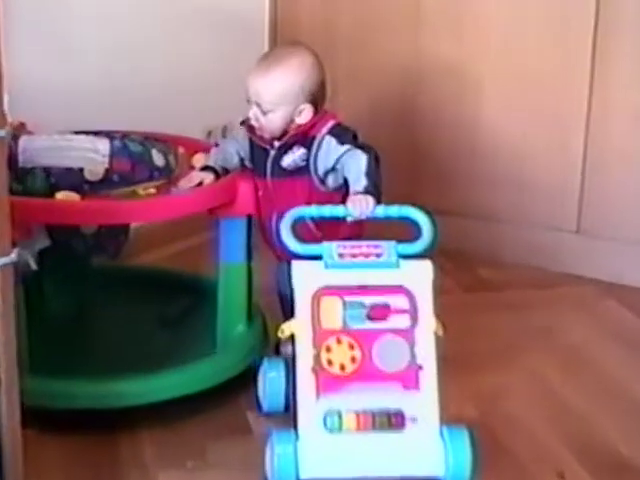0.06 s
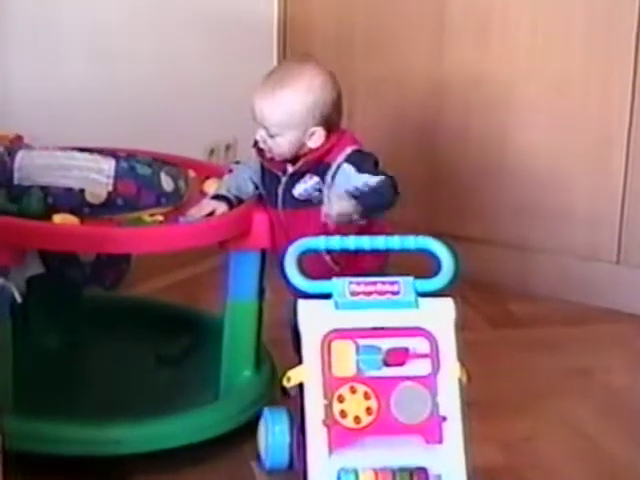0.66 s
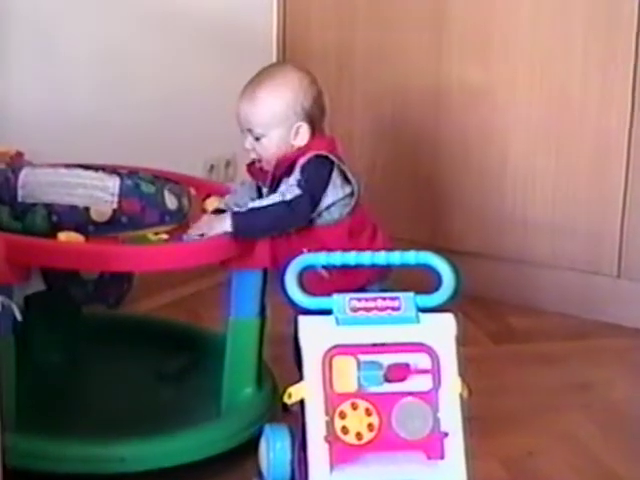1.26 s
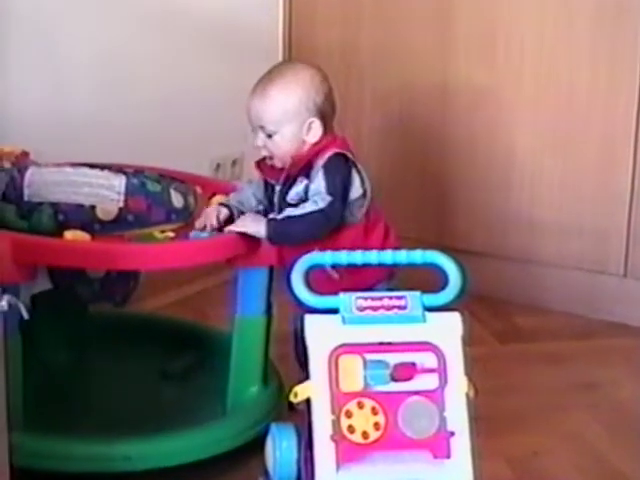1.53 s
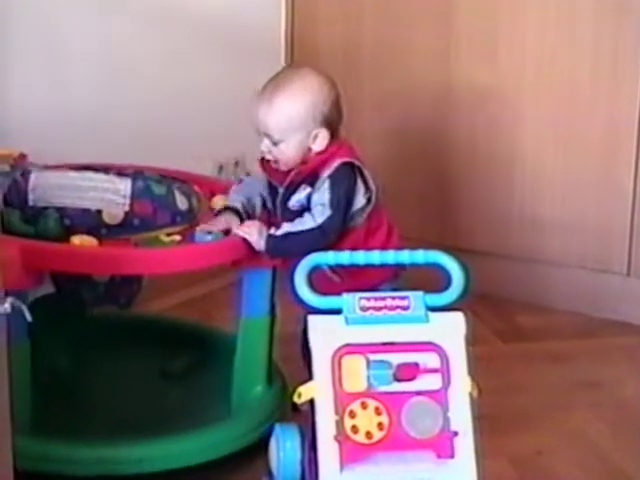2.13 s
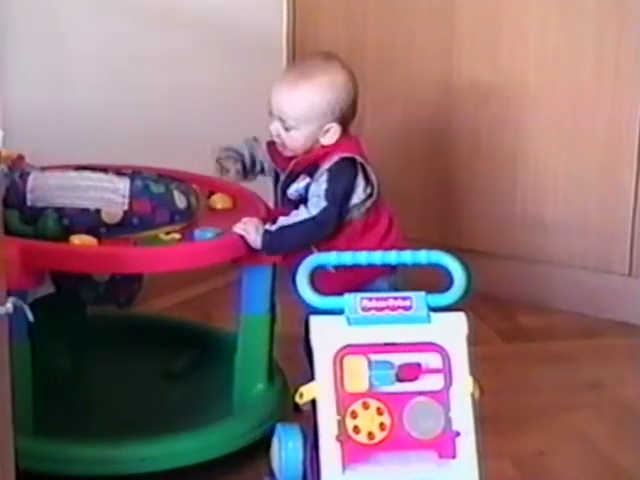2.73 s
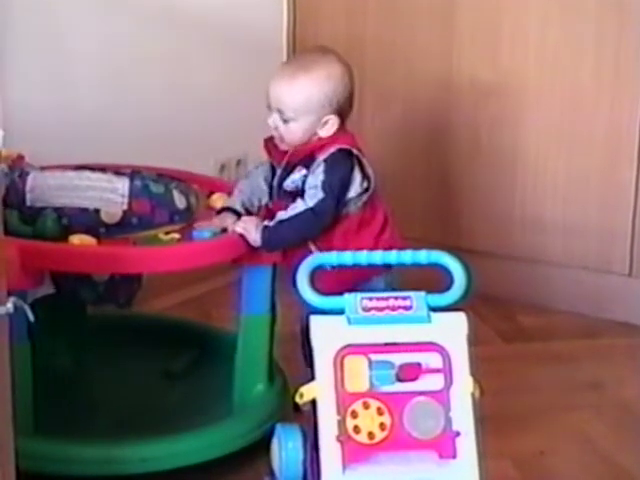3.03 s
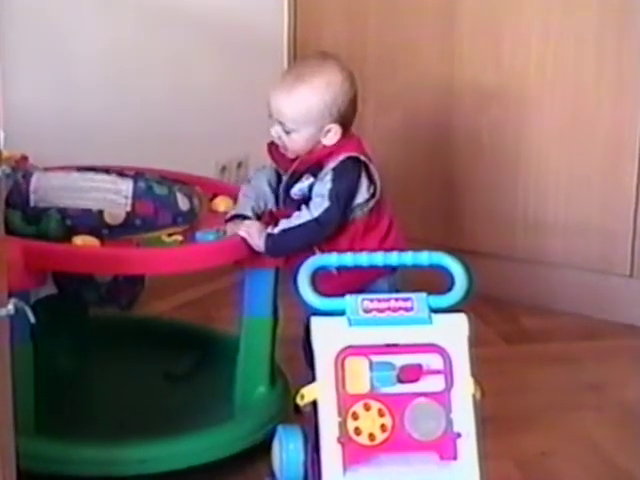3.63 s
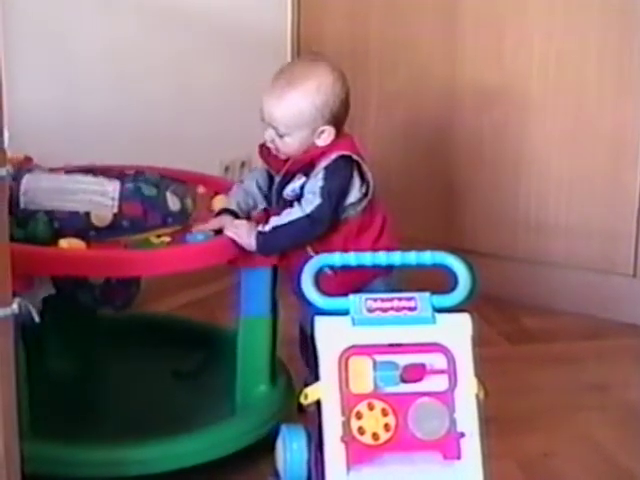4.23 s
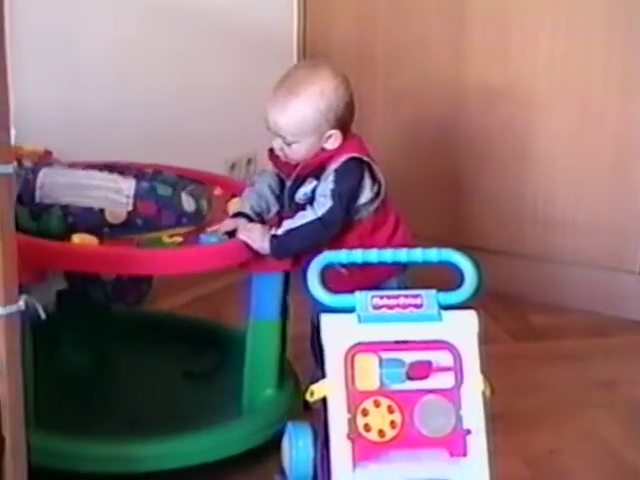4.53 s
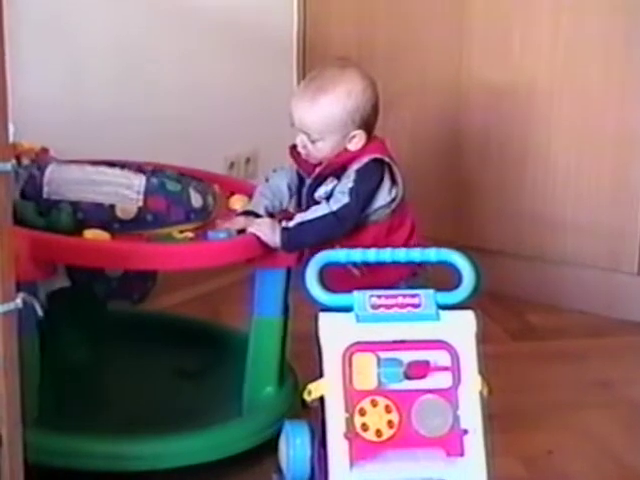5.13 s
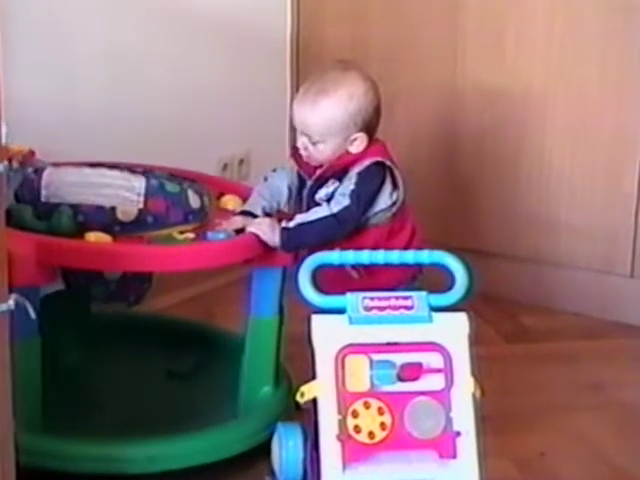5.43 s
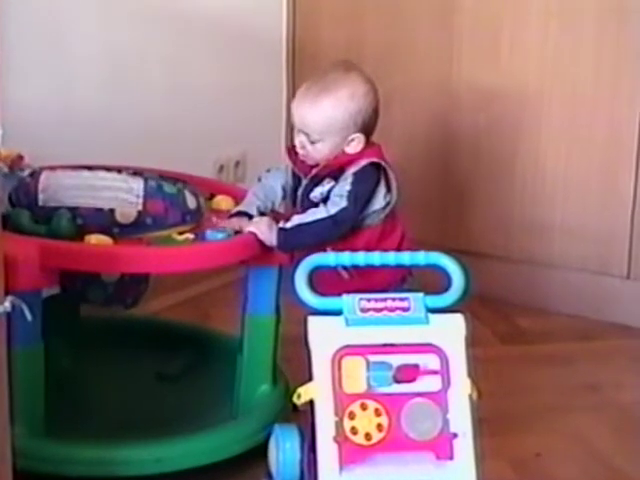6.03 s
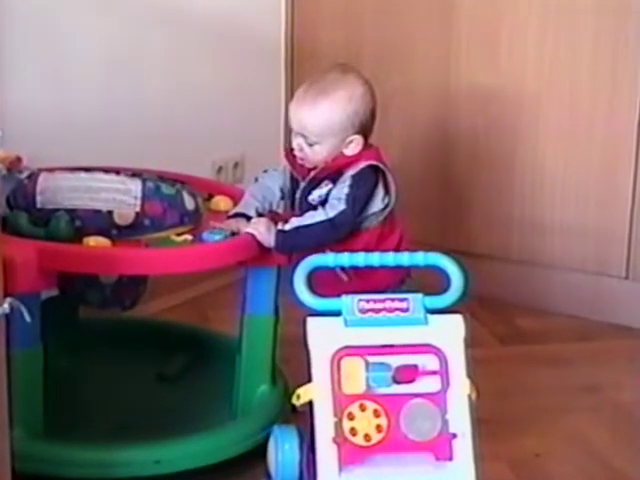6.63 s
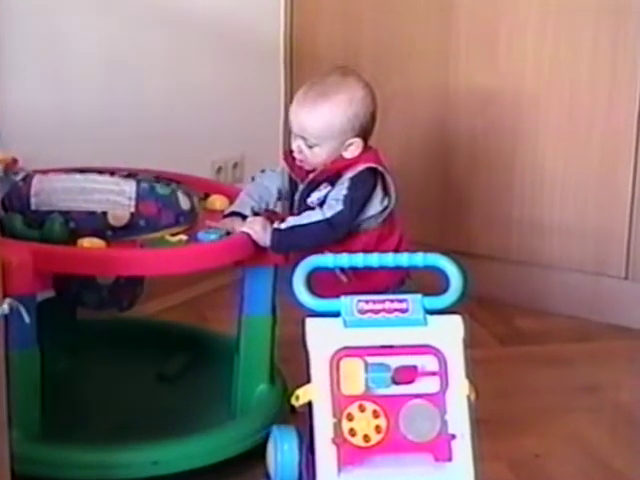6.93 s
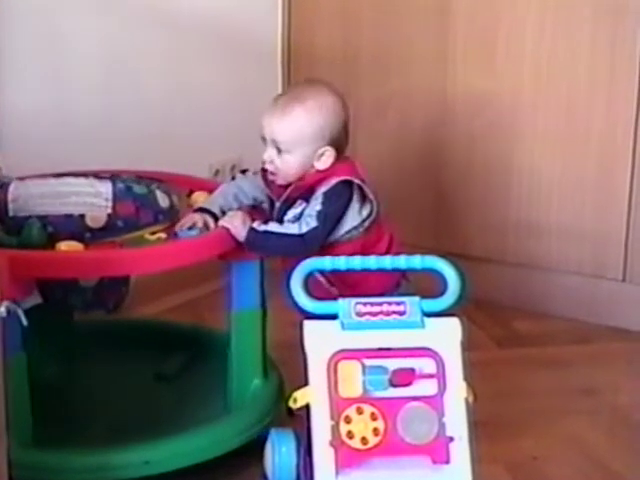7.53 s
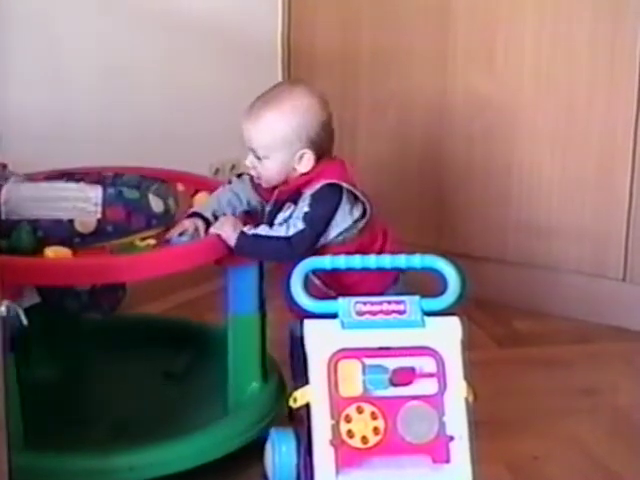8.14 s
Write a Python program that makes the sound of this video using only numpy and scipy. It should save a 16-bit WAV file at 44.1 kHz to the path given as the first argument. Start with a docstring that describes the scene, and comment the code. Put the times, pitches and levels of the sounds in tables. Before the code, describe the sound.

In a small, slightly echoing room, one light slap on a hollow plastic tray leads to four louder ones about half a second apart and a last, weaker one, each shaking loose toys. After that come only soft, scattered knocks, small clicks and the rub of a hand and sleeve. The sound sits slightly to the right, over steady low hiss and a faint camera motor.

```python
"""A baby slaps the hollow plastic tray of a play seat in a small room with a wooden floor.
Each slap pops the air under the palm, booms in the tray and rings the toys fixed to it.
Loose toys rattle after it. Between slaps, hands and toys knock, click and rub lightly
and a sleeve swishes. A tape camera whirs over steady hiss."""
import sys
import numpy as np
from scipy import signal
from scipy.fft import rfft, irfft, next_fast_len
from scipy.io import wavfile
from scipy.ndimage import map_coordinates

SR = 44100
rng = np.random.default_rng(int(sys.argv[2]) if len(sys.argv) > 2 else 0)


def bounce(signal):
    """Save signal as a 16-bit WAV file at the path given by the first command-line argument."""
    frames = np.transpose(np.atleast_2d(signal))
    limited = np.clip(frames, -1, 1)
    pcm = np.round(limited * 32767).astype(np.int16)
    wavfile.write(sys.argv[1], SR, pcm)


N = 369116
SIZE = 32768  # samples per contact
T, HZ = np.arange(SIZE) / SR, np.fft.rfftfreq(SIZE, 1 / SR)
TIME = np.arange(N) / SR

# slaps: t/s, palm lag/s, tray/dB, bass/dB, treble/dB,
# finger pop/Hz, palm pop/Hz, pop width/Hz, pop/dB, bead/dB, button/dB
SLAPS = [(.951, .003, -24, 6.5, 3.5, 1105, 1227, 32, 1, -17, -55),
         (1.956, 0.0043, -7.5, -1.5, 1, 1460, 1470, 80, -10, -5.5, -42),
         (2.373, .006, -4, -0.5, -2, 1210, 1340, 115, -4, -11, -11.5),
         (2.871, 0.012, -4.5, -1, 1, 840, 880, 118, -7, -38, -13.5),
         (2.901, .003, -13, 6.5, 8, 1175, 1190, 150, -9.5, -15, -27),
         (3.499, .003, -7.5, -0.5, 2.5, 1560, 1306, 177, -4.5, -12.5, -8.5),
         (4.097, .002, -21, 2, 6.5, 1290, 1255, 104, -4.5, -19, -15)]
# soft-contact spectrum: f/Hz, level/dB
SOFT_SPECTRUM = [(30, -16), (120, -10), (260, -4.5), (500, -4), (1000, 2), (1500, -2), (2500, -5.5),
                 (4000, -16.5), (8000, -30.5), (16000, -39)]
# left-right coherence of room sound: f/Hz, coherence
ROOM_COHERENCE = [(60, 1), (150, 0.25), (380, 0.54), (950, 0.77), (2380, 0.67), (5980, 0.3), (15000, 0.065)]


def slaps(finger_db=-5, finger_treble_db=5.5, puff_db=-33, puff_hz=45, puff_decay_s=0.01):
    """Fingers land, then the palm; each sounds tray, trapped air and toys, and pushes a puff of air."""
    # hard-contact spectrum: f/Hz, level/dB
    hard_spectrum = [(30, -26), (110, -17.5), (170, -13.5), (250, -4), (450, -5), (1000, -1.5),
                     (1900, -2.5), (3000, -6), (5000, -13.5), (8000, -16), (12500, -28), (16000, -24)]
    # toy resonances: f/Hz, width/Hz, level/dB
    bead_modes = [(3397, 68, 3.5), (3460, 32, -12.5), (3700, 90, -41), (7030, 100, -8), (8280, 82, -15),
                  (8640, 500, -13.5), (9140, 80, -16), (11740, 210, -13)]
    button_modes = [(3620, 170, -4), (4030, 99, -1.5), (4330, 35, 1.5), (4500, 30.6, -6), (4650, 21, -16),
                    (5600, 50, -3), (6600, 38, -14), (7250, 28, -22), (9270, 68, -14), (11050, 720, -17)]
    out = np.zeros((2, N))
    puff = np.sin(2 * np.pi * puff_hz * T) * np.exp(-T / puff_decay_s)
    bead, button = ring(bead_modes, HZ), ring(button_modes, HZ)
    for (start_s, lag_s, db, bass_db, treble_db,
         finger_hz, palm_hz, width_hz, pop_db, bead_db, button_db) in SLAPS:
        toys = amp(bead_db) * bead + amp(button_db) * button
        finger_shell = tray(hard_spectrum, bass_db, treble_db + finger_treble_db)
        palm_shell = tray(hard_spectrum, bass_db, treble_db)
        fingers = (start_s, db + finger_db, finger_shell, finger_hz)
        palm = (start_s + lag_s, db, palm_shell, palm_hz)
        for at_s, force_db, shell, pop_hz in (fingers, palm):
            pop = ring([(pop_hz, width_hz, pop_db)], HZ)
            hit = contact(amp(force_db) * shell + pop + toys)
            add(out, at_s, hit + amp(puff_db + 0.4 * force_db) * puff)
    return out


def tray(spectrum, bass_db, treble_db, bass_hz=550, treble_hz=3200, modes_db=-1, scatter_db=2):
    """Tray response: heavy contacts add bass, hard ones treble; each spot favours other modes."""
    # tray resonances: f/Hz, width/Hz, level/dB
    tray_modes = [(243.7, 9.3, 4.5), (317, 76, -12.5), (529, 9.5, 0), (713, 5.1, 2), (839, 5.1, 0),
                  (913, 6, -3), (1112, 46, -4), (1300, 12, -3.5), (1590, 7.3, -24), (2100, 22, -7),
                  (2312, 18, -3.5), (3120, 15, 5), (3330, 16, -6), (4480, 13, -13), (7600, 13, -22)]
    shelves_db = bass_db / (1 + (HZ / bass_hz) ** 4) + treble_db / (1 + (treble_hz / (HZ + 1)) ** 4)
    modes = [(hz, width_hz, db + scatter_db * rng.standard_normal()) for hz, width_hz, db in tray_modes]
    return minimum_phase(shelves_db + curve(spectrum, HZ)) * (1 + amp(modes_db) * ring(modes, HZ))


def rattles(count=4, wait_s=0.1, span_s=0.27, below_slap_db=24, fade_db_per_s=38):
    """Loose toys tap the tray at random after each slap, ever more weakly."""
    taps = np.zeros((1, N))
    for start_s, _, slap_db, *_ in SLAPS:
        for delay_s in wait_s + span_s * (np.arange(count) + rng.random(count)) / count:
            tap_db = slap_db - below_slap_db - fade_db_per_s * delay_s
            add(taps, start_s + delay_s, np.full((1, 1), amp(tap_db)))
    tap = contact(tray(SOFT_SPECTRUM, bass_db=4, treble_db=-6))
    return signal.fftconvolve(taps, tap, axes=1)[:, :N]


def knocks(loss_factor=0.084):
    """Soft contacts sound the tray, plus a short pop of air trapped under the fingers."""
    # knocks: t/s, level/dB, bass/dB, treble/dB, note/Hz, note/dB
    touches = [(.003, -36.5, 6, -1, 347, 14.5), (.143, -32, 3.5, 2, 497, 6), (.377, -41.5, -6, 7, 2080, 3),
               (.457, -48, 18, 5, 546, 20.5), (.772, -39, 2, -7, 850, 0),
               (1.03, -34.5, 7.5, -12, 1090, -14), (1.144, -30, -4.5, -0.5, 1060, -6),
               (1.282, -40.5, 6.5, 3, 970, 8), (1.553, -43, -2, 0, 1310, -7), (1.65, -40, 2, -10, 1230, 8),
               (1.741, -24, -1, -7, 1250, 13), (1.902, -25.5, 0, 3, 1660, -0.5),
               (2.634, -35.5, 7, -10, 790, 9), (3.325, -43, 6, -2, 1080, 0), (3.482, -27, 0, 1.5, 2400, -1),
               (3.750, -25.5, -23, 3.5, 2670, -12), (3.928, -36, -7, -20.5, 1030, -2),
               (4.545, -36.5, 9.5, -5, 1100, 2), (4.592, -32, 5.5, 6, 880, 2),
               (4.62, -25.5, -4, -20, 297, 6), (5.6, -43, 2, 7, 3700, 5.5),
               (5.982, -40.5, 1, -13, 1040, -9), (6.609, -42, -9, -19, 756, 8),
               (7.38, -27.5, -3.5, -1.5, 194, 3.5), (7.84, -26, -3, 3, 1600, 4.5),
               (8.018, -21, 1.5, 3.5, 305, 2), (8.312, -37.5, -2, 10.5, 1480, -4)]
    out = np.zeros((2, N))
    for start_s, db, bass_db, treble_db, hz, note_db in touches:
        note = ring([(hz, loss_factor * hz, note_db)], HZ)
        add(out, start_s, amp(db) * contact(tray(SOFT_SPECTRUM, bass_db, treble_db) + note))
    return out


def near_clicks(t60_s=0.015, treble_hz=3500):
    """A small plastic part clicks, too near to stir the room."""
    # clicks: t/s, level/dB, treble/dB
    clicks = [(.413, -50, 22.5), (0.5999, -28, 1.5), (4.489, -42.5, -17), (7.361, -42, -12)]
    # f/Hz, level/dB
    spectrum = [(40, 13), (130, 5), (400, -2), (1000, 7), (1700, 12), (2800, 3.5), (4000, -10),
                (8000, -13.5), (15000, -30)]
    out = np.zeros((2, N))
    shelf = 1 / (1 + (treble_hz / (HZ + 1)) ** 4)
    for start_s, db, treble_db in clicks:
        snap = diffuse(SIZE, ROOM_COHERENCE) * np.exp(-np.log(1000) * T / t60_s)
        response = minimum_phase(curve(spectrum, HZ) + treble_db * shelf)
        add(out, start_s, amp(db) * irfft(response * rfft(snap)))
    return out


def rubbing(bell_exponent=1.93):
    """Hand and sleeve slide over the tray's rim, louder as the arm moves faster."""
    # arm strokes: peak t/s, rise/s, fall/s, hand/dB, sleeve/dB
    strokes = [(.02, 0.06, 0.31, -55.5, -60), (.01, 0.03, 0.025, -58, -51.5),
               (.413, 0.007, 0.018, -66, -53.5), (.59, .09, 0.058, -51, -61.5),
               (1.765, 0.07, 0.068, -38.5, -40.5), (3.66, 0.065, 0.091, -39, -66),
               (4.61, 0.055, 0.021, -46, -67), (5.285, .012, 0.01, -75, -57),
               (7.445, .015, 0.023, -58, -59), (7.7, 0.2, .25, -67, -79), (8.07, 0.1, 0.072, -48.5, -60)]
    # sleeve spectrum: f/Hz, level/dB
    cloth_spectrum = [(100, -20), (700, 3), (1500, -2), (4500, -1), (8000, -5.5), (13000, -13.5),
                      (16000, -19)]
    # rim resonances: f/Hz, width/Hz, level/dB
    rim_modes = [(320, 310, 4.5), (532, 59, -1.5), (1410, 190, -2), (2760, 56, -3.5), (4290, 140, -4.5)]
    hand, sleeve = np.zeros((2, N))
    for peak_s, rise_s, fall_s, hand_db, sleeve_db in strokes:
        t = TIME - peak_s
        speed = np.exp(-np.abs(t / np.where(t < 0, rise_s, fall_s)) ** bell_exponent)
        hand += amp(hand_db) * speed
        sleeve += amp(sleeve_db) * speed
    drag = friction(hand, SOFT_SPECTRUM, rim_modes, slips_per_s=470)
    swish = friction(sleeve, cloth_spectrum, rim_modes, slips_per_s=5700)
    return drag + swish


def friction(envelope, spectrum, modes, slips_per_s):
    """Tiny uneven slips excite the modes and the room."""
    slips = rng.standard_normal(N) * (rng.random(N) < slips_per_s / SR)
    scrape = filtered(slips, lambda hz: amp(curve(spectrum, hz)) * (1 + ring(modes, hz)))
    stroke = unit_rms(scrape) * envelope
    walls = room()
    return signal.fftconvolve(stroke[None], walls / np.linalg.norm(walls[0]), axes=1)[:, :N]


def contact(response):
    """One contact with this frequency response in the room, faded out."""
    fade = np.clip(4 * (1 - T / T[-1]), 0, 1) ** 2
    return irfft(response * rfft(room())) * fade


def room(crack_db=3, crack_t60_s=0.0067, early_db=-4, early_t60_ratio=0.69, tail_db=-5.5, rise_s=0.00047):
    """Impulse response: direct crack, early returns from the near corner, tail; treble dies first."""
    # reverberation: f/Hz, t60/s
    decay_times = [(100, 0.86), (260, 0.82), (700, 0.49), (1840, 0.46), (4850, 0.42), (12800, 0.26)]
    hz, t, noise = signal.stft(diffuse(SIZE, ROOM_COHERENCE), SR, nperseg=256)
    fall_db = -60 * t / curve(decay_times, hz)[:, None]
    returns = np.hypot(amp(early_db + fall_db / early_t60_ratio), amp(tail_db + fall_db))
    walls = signal.istft(noise * returns, SR)[1][:, :SIZE]
    crack = amp(crack_db) * diffuse(SIZE, ROOM_COHERENCE) * np.exp(-np.log(1000) * T / crack_t60_s)
    return (crack + walls) * (1 - np.exp(-T / rise_s))


def camera_whir(flutter_rad=0.5, drift_hz=10):
    """Mains hum, tape motor and line whistle, each drifting in phase."""
    # tones: f/Hz, level/dB
    tones = [(59.6, -75.5), (180, -79), (796.7, -75), (1087, -74.5), (1572, -77), (1723, -74.5),
             (1873, -72.5), (1992, -77), (2174, -74.5), (2471, -81.5), (15735, -78.5)]
    out = np.zeros(N)
    for hz, db in tones:
        drift = map_coordinates(rng.standard_normal(100), [TIME * drift_hz])
        out += np.sqrt(2) * amp(db) * np.sin(2 * np.pi * hz * TIME + flutter_rad * drift)
    return out


def hiss(level_db=-58.5):
    """Steady, wide background noise."""
    # hiss spectrum: f/Hz, level/dB
    spectrum = [(12, -26), (20, -12), (84, 2.5), (183, -6), (242, -4.5), (357, -3), (457, -5.5),
                (733, -1.5), (796, 0), (1170, -5), (1930, -4.5), (2340, -8), (3970, -10.5), (4820, -16),
                (15000, -24)]
    # left-right coherence: f/Hz, coherence
    coherence = [(60, 0.65), (150, -0.16), (380, -0.17), (950, 0.038), (2380, -0.46), (5980, -0.1),
                 (15000, 0.12)]
    noise = filtered(diffuse(N, coherence), lambda hz: amp(curve(spectrum, hz)))
    return amp(level_db) * unit_rms(noise)


def diffuse(size, coherence):
    """Stereo white noise from all sides; negative coherence counts as 0."""
    angle = np.arccos(np.clip(curve(coherence, np.fft.rfftfreq(size, 1 / SR)), 0, 1)) / 2
    mid, side = rfft(rng.standard_normal((2, size))) * [np.cos(angle), np.sin(angle)]
    return irfft([mid + side, mid - side], size)


def ring(modes, hz):
    """Response of resonances: f/Hz, width/Hz, level/dB."""
    return sum(amp(db) * 1j * hz * width / (f * f - hz * hz + 1j * hz * width) for f, width, db in modes)


def minimum_phase(db):
    """Causal response with this gain."""
    cepstrum = irfft(np.log(amp(db)))
    cepstrum[1:SIZE // 2] *= 2
    cepstrum[SIZE // 2 + 1:] = 0
    return np.exp(rfft(cepstrum))


def filtered(x, response):
    """Apply response(hz) to x."""
    size = next_fast_len(N + SIZE)
    return irfft(rfft(x, size) * response(np.fft.rfftfreq(size, 1 / SR)), size)[..., :N]


def curve(points, hz):
    """Interpolate (f/Hz, value) points over log frequency."""
    f, values = np.transpose(points)
    return np.interp(np.log(hz + 1), np.log(f + 1), values)


def amp(db):
    """Decibels to gain."""
    return 10 ** (np.asarray(db) / 20)


def unit_rms(x):
    """Scale to rms 1."""
    return x / np.sqrt(np.mean(x ** 2) + 1e-20)


def add(out, start_s, x):
    """Mix x into out."""
    part = out[:, max(round(start_s * SR), 0):][:, :x.shape[1]]
    part += x[:, :part.shape[1]]


def scene():
    """All sources, in stereo."""
    return slaps() + rattles() + knocks() + near_clicks() + rubbing() + hiss() + camera_whir()


def record(dry, ceiling_db=-3, top_hz=15850):
    """Lean to the right, round off peaks, limit the band."""
    # balance: f/Hz, left minus right/dB
    balance = [(60, 1), (120, -10), (240, -3.5), (480, -2), (950, -1.5), (1890, -3.5), (3770, -3.5),
               (7520, -1.5), (15000, -0.5)]
    pair = filtered(dry, lambda hz: amp(np.outer([.5, -.5], curve(balance, hz))))
    rounded = pair / (1 + (pair / amp(ceiling_db)) ** 4) ** .25
    return filtered(rounded, lambda hz: hz < top_hz)


dry = scene()
out = record(dry)
bounce(out)
```